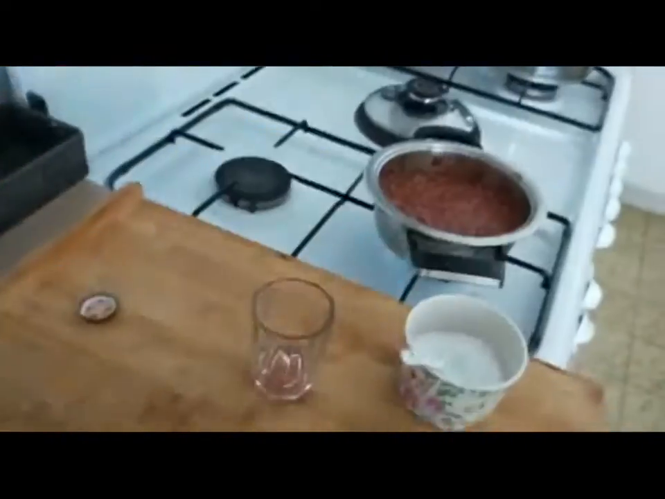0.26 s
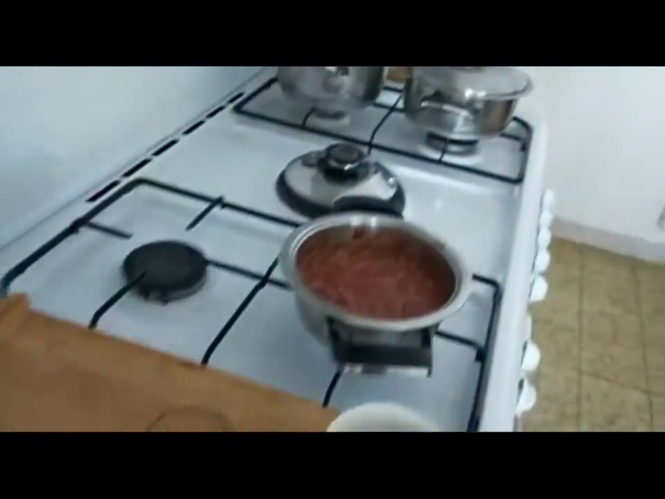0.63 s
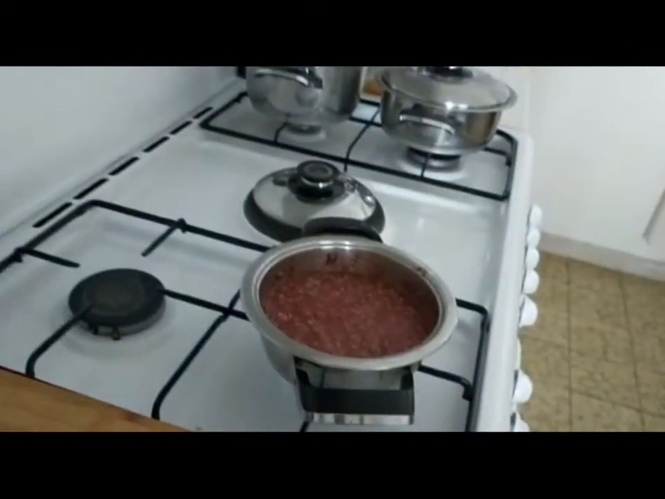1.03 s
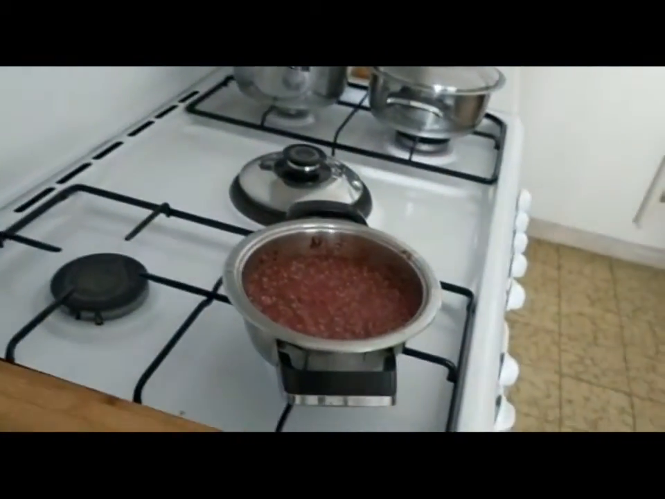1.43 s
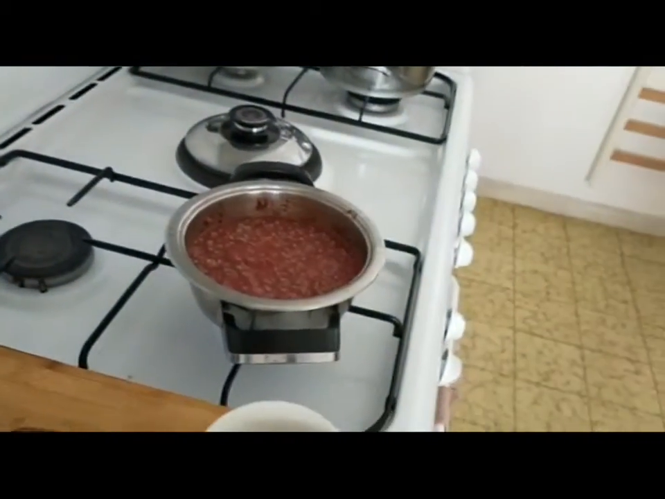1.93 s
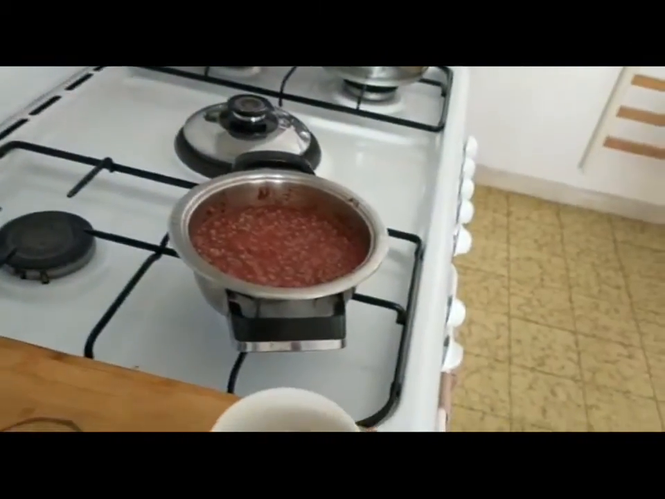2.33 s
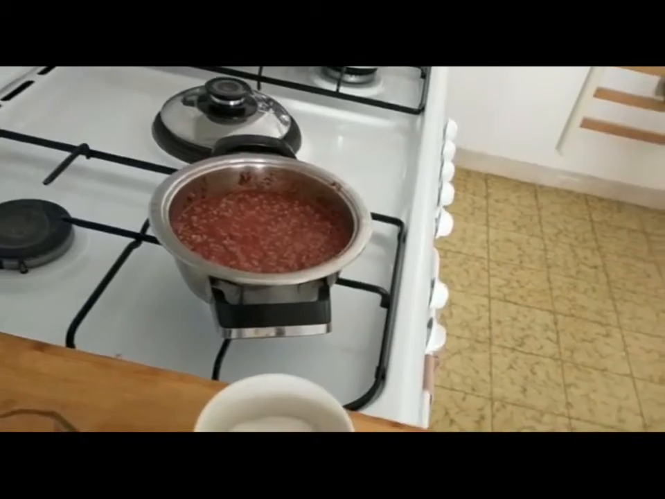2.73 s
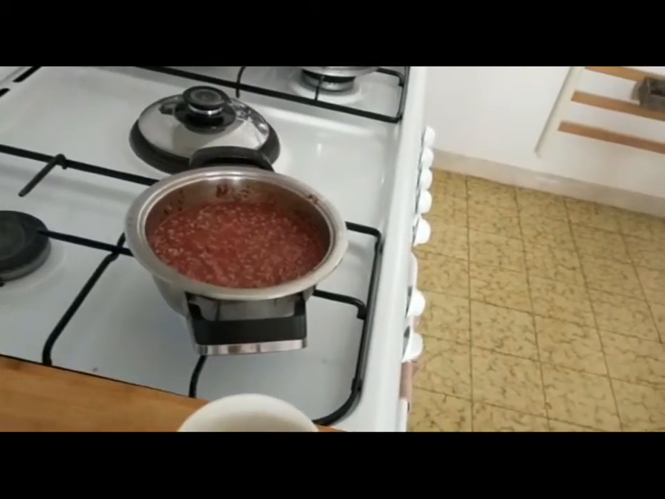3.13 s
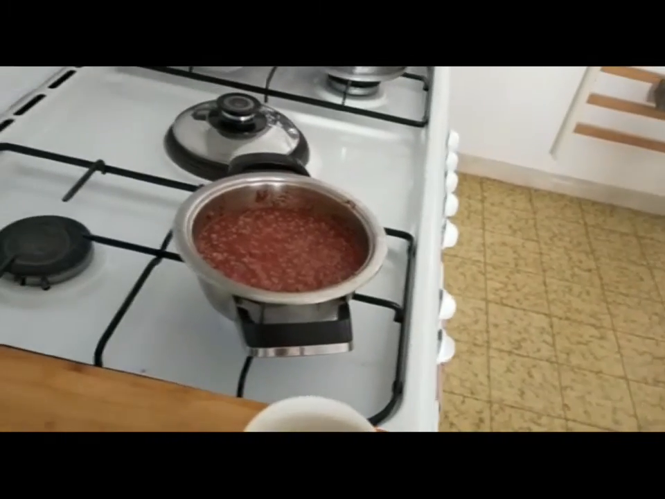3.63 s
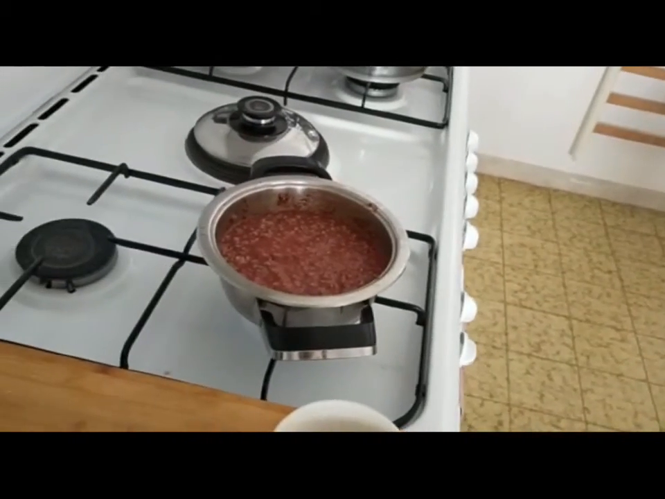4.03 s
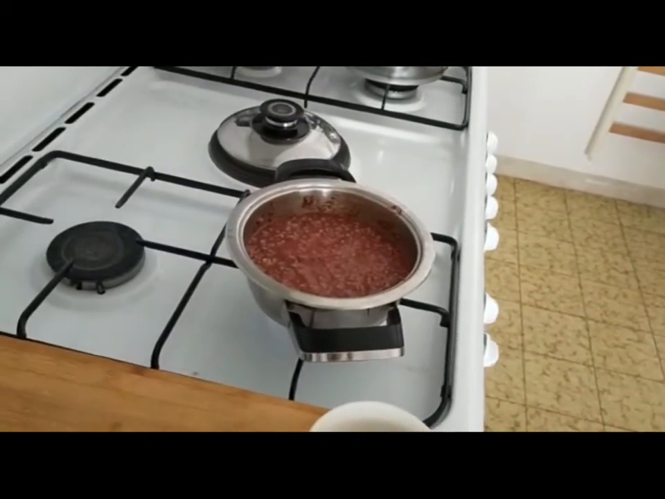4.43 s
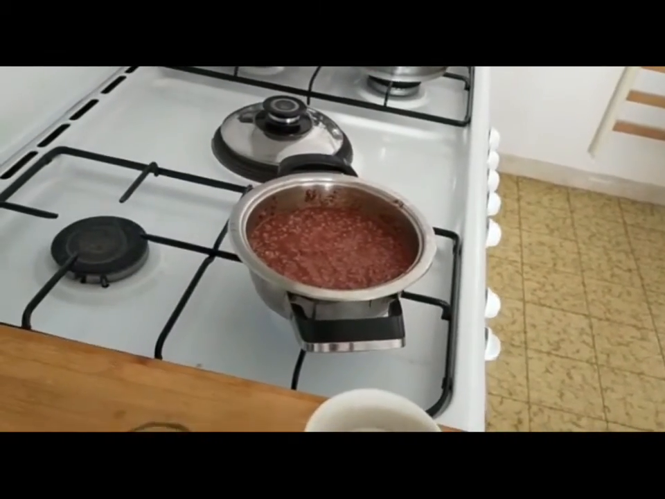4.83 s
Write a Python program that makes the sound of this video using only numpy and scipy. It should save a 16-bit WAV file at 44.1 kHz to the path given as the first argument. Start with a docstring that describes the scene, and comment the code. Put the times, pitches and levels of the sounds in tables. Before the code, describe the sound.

Soft room hush with tiny dry clicks and low bumps from the handheld camera. A glass is set down hard on wood, with a bright crack, brief glassy ring and hard-walled echo. After a pause, water runs in uneven spurts, hissing brightly with gurgles and drops. A second, woodier knock sounds soon after it starts. The water slackens, then surges again and is cut off running.

```python
"""A glass is knocked twice on a wooden worktop; later water runs, hissing, splashing and gurgling.
The knocks are noise cracks plus fading tones. The water is shaped noise, with short tones for bubbles.
Around them is a quiet home kitchen: soft air noise, small dry taps, and the ticks and thumps
of a worn camera's mount. Hard walls answer the taps, the knocks and the water with fading noise."""
import sys
import numpy as np
from scipy import signal
from scipy.fft import rfft, irfft, next_fast_len
from scipy.io import wavfile
from scipy.ndimage import uniform_filter1d, map_coordinates

SR = 44100
rng = np.random.default_rng(int(sys.argv[2]) if len(sys.argv) > 2 else 0)


def to_wav(sig):
    """Store sig (one row per channel, or 1-D mono) as 16-bit WAV at the path in sys.argv[1].

    Samples outside -1..1 are clipped; the rate is SR.
    """
    pcm = np.clip(np.atleast_2d(sig), -1, 1) * 32767
    pcm = np.round(pcm).astype(np.int16)
    wavfile.write(sys.argv[1], SR, pcm.T)  # frames by channels


N = 223454  # length in samples, about 5 s


def amp(db):
    """Turn decibels into a plain multiplier."""
    return 10 ** (np.asarray(db) / 20)


def unit(x):
    """Bring a sound to an average (rms) level of 1."""
    return x / np.sqrt(np.mean(x ** 2) + 1e-20)


def noise(size):
    """White noise: all pitches equally strong."""
    return rng.standard_normal(size)


def along(points, hz):
    """Read a value at each pitch from (pitch_hz, value) points, on a log pitch axis."""
    f, v = np.transpose(points)
    return np.interp(np.log(hz + 1), np.log(f + 1), v)


def curves(rows, before_db=None):
    """Draw one value per sample for each column after the time."""
    s, *columns = np.transpose(rows)
    t = np.arange(N) / SR
    return [np.interp(t, s, column, left=before_db) for column in columns]


def wobble(rate):
    """A smooth random curve through `rate` random points a second."""
    points = noise(int(N * rate / SR) + 4)
    return map_coordinates(points, [np.arange(N) * rate / SR])


def coloured(x, spectrum):
    """Make some pitches of x louder than others, following (pitch_hz, level_db) points; rms 1."""
    m = next_fast_len(len(x) + 8192)
    gain = amp(along(spectrum, np.fft.rfftfreq(m, 1 / SR)))
    return unit(irfft(rfft(x, m) * gain, m)[:len(x)])


def band(x, hz, width_hz):
    """Keep one rounded band of x, at rms 1."""
    half, edge = width_hz / 2, 3 * width_hz
    shape = [(hz - edge, -60), (hz - half, -4), (hz, 0), (hz + half, -4), (hz + edge, -60)]
    return coloured(x, shape)


def patchy(depth_db):
    """White noise that is randomly louder and softer in patches of time and pitch."""
    z = signal.stft(noise(N + 512), nperseg=256)[2]
    field = uniform_filter1d(noise(z.shape), size=5, axis=0)
    field = uniform_filter1d(field, size=6, axis=1)
    return signal.istft(z * amp(depth_db * unit(field)), nperseg=256)[1][:N]


def add(track, s, sound):
    """Mix a sound into the track at s seconds."""
    part = track[round(s * SR):][:len(sound)]
    part += sound[:len(part)]


def ring(modes, t, attack, rough=0):
    """A struck object's fading tones, with slightly new strengths each time; rough makes them unsteady."""
    drift = rough * np.cumsum(noise((len(modes), len(t))), axis=1)
    chance_db = rng.normal(0, 1, len(modes))
    total = 0
    for (hz, db, t60), extra_db, wander in zip(modes, chance_db, drift):
        total = total + amp(db + extra_db - 60 * t / t60) * np.sin(2 * np.pi * hz * t + wander)
    return (1 - np.exp(-t / attack)) * total


def bubbles(s, db, hz, cycles, rise, size=1300):
    """Fading tones whose pitch creeps up, as a bubble's does when it nears the surface."""
    k = np.arange(size)
    turns = hz[:, None] * k / SR
    age = turns / np.maximum(cycles, 1)[:, None]  # 1 = one life, when the tone is down to a tenth
    wave = np.sin(2 * np.pi * turns * (1 + rise * np.minimum(age, 2)))
    wave = wave * np.exp(-2.3 * age) * (1 - np.exp(-age / 0.15))
    at = (s * SR).astype(int)[:, None] + k
    return np.bincount(at.ravel(), (amp(db)[:, None] * wave).ravel(), N + len(k))[:N]


# How long the room rings at each pitch: pitch_hz, time to fall 60 dB (t60_s)
WALL_DECAY = [(100, 0.71), (420, 0.7), (1100, 0.64), (2900, 0.52), (7700, 0.5), (15000, 0.25)]
ROOM_DELAY_S, ROOM_FILLS_S = 0.004, 0.0059  # the answer comes late, then builds up


def walls(x):
    """The room's echo of x: a wash of noise in which each pitch dies at its own speed."""
    hz, t, z = signal.stft(noise(SR), SR, nperseg=256)
    fade = amp(-60 * t / along(WALL_DECAY, hz)[:, None])
    tail = signal.istft(z * fade, SR, nperseg=256)[1]
    tail = tail * (1 - np.exp(-np.arange(len(tail)) / SR / ROOM_FILLS_S))
    delayed = np.pad(x, (round(ROOM_DELAY_S * SR), 0))
    return signal.fftconvolve(delayed, tail / np.linalg.norm(tail))


# Loudness of the kitchen hush, settling at first: time_s, level_db
AIR_LEVEL = [(0, -53.5), (.12, -62), (.3, -64.5), (1, -65.5), (2.7, -66)]
# Colour of the hush: pitch_hz, relative_level_db (per Hz)
AIR_COLOUR = [(120, -50), (200, -11.5), (322, 3.5), (380, -5), (647, -4), (709, -5), (1120, -5.5),
              (2050, -4), (3760, -16), (4680, -16.5), (5420, -16), (7540, -10), (9750, -21.5),
              (14900, -0.5), (16000, -6.5)]
# Colour of the low rumble: pitch_hz, relative_level_db (per Hz)
RUMBLE_COLOUR = [(12, -34), (20, 5.5), (33, -14.5), (130, -10), (189, -21.5), (300, -27.5), (390, -54),
                 (660, -120)]
# Narrow steady whines: pitch_hz, width_hz, level_db
WHINE_BANDS = [(2025, 420, -74), (3500, 80, -92), (4880, 120, -86), (7490, 500, -78), (15400, 400, -74.5),
               (12830, 300, -80)]


def hush():
    """Distant air noise with a few narrow whines, over a low uneven rumble."""
    air = amp(curves(AIR_LEVEL)[0]) * coloured(patchy(depth_db=2.0), AIR_COLOUR)
    whines = sum(amp(db) * band(noise(N), hz, width) for hz, width, db in WHINE_BANDS)
    rumble = amp(-66.5 + 2.6 * wobble(12.0)) * coloured(noise(N), RUMBLE_COLOUR)
    return air + whines + rumble


# Short noise bursts; all rows but the last are small dry taps and ticks, and the last is one thin,
# very high spit of the spray: start_s, start_level_db, centre_hz, spread_octaves, t60_s
SHORT_BURSTS = [(.108, -58, 890, 1.6, 0.049), (1.58, -56, 3800, 0.91, 0.007),
                (1.689, -61.5, 6000, 0.97, 0.032), (1.839, -50.5, 4560, 1.5, 0.0064),
                (2.415, -59, 1490, 0.78, 0.03), (2.487, -46.5, 2610, 0.6, 0.011),
                (2.5, -45.5, 604, 1.02, 0.06), (2.732, -43, 1060, 0.97, 0.023),
                (4.021, -29.5, 15000, 0.082, .03)]
BURST_ROOM_DB = -5.5


def short_bursts(rows):
    """Each row is a burst of noise, spread around its centre pitch, with the room's answer."""
    out, t = np.zeros(N), np.arange(SR // 8) / SR
    # (steps of the spread away from the centre, relative level in dB)
    shape = [(-7.0, -48), (-2.5, 0), (0.5, 4.5), (2, -20.5), (0.5, -28), (15.5, -46)]
    for s, db, hz, spread, t60 in rows:
        colour = [(hz * 2 ** (spread * step), level_db) for step, level_db in shape]
        burst = amp(db - 60 * t / t60) * coloured(noise(len(t)), colour)
        add(out, s, burst)
        add(out, s, amp(BURST_ROOM_DB) * walls(burst))
    return out


def taps():
    """Small dry taps and ticks: short bursts of noise."""
    return short_bursts(SHORT_BURSTS[:-1])


# The camera mount shifts: start_s, thump_start_level_db, tick_level_db (before the tick's shaping)
MOUNT_SHIFTS = [(0.12, -44.5, -54), (0.144, -55, -52), (0.257, -53, -39), (0.318, -46, -41),
                (0.351, -55, -48), (0.585, -48, -40), (0.629, -46, -39), (0.646, -48.5, -43),
                (0.717, -42, -60), (0.974, -55, -45), (1.484, -50.5, -37.5), (1.577, -53.5, -38.5),
                (1.6, -50.5, -44), (1.677, -50, -40), (1.839, -45.5, -38), (1.869, -48.5, -49),
                (2.024, -52, -60), (2.324, -55, -41), (2.594, -47, -43), (3.16, -48, -51),
                (4.975, -44.5, -28.5)]
# Faint short tones: start_s, peak_level_db
FAINT_PIPS = [(0.449, -61.5), (0.477, -62), (0.6709, -60)]
HOUSING_HZ, HOUSING_SCATTER, HOUSING_T60_S = 88, .1, 0.055  # scatter: share of the pitch
TICK_S, PIP_HZ = 0.00012, 1205


def mount():
    """Each shift is a dull tick and a few fading low cycles of the housing; faint pips are added."""
    out, t = np.zeros(N), np.arange(SR // 20) / SR
    pitches = HOUSING_HZ * (1 + HOUSING_SCATTER * noise(len(MOUNT_SHIFTS)))
    for (s, db, tick_db), hz in zip(MOUNT_SHIFTS, pitches):
        thump = amp(db - 60 * t / HOUSING_T60_S) * np.sin(2 * np.pi * hz * t)
        tick = amp(tick_db) * t / TICK_S * np.exp(-t / TICK_S)
        add(out, s, tick - thump)
    for s, db in FAINT_PIPS:
        swell = np.exp(-((t - .008) / 0.0051) ** 2)  # loudest 8 ms after the start
        add(out, s, amp(db) * np.sin(2 * np.pi * PIP_HZ * t) * swell)
    return out


# Glass on wood, one list of blows for each spot: start_s, blow_level_db, then levels relative to the
# blow: worktop_db, glass_wall_db, glass_base_db, cupboard_db, floor_boom_db, room_db
KNOCK_BLOWS = [
    [(1.0930, -4.5, -28, -23, -47, -38, -47.5, -24.5), (1.1220, -13, -34, -26, -48, -38, -42, -30)],
    [(3.2980, -5, -19, -36, -36, -29.5, -29, -19.5)],
]
# Colour of a blow at each of the two spots: pitch_hz, relative_level_db (per Hz)
BLOW_COLOURS = [
    [(29, -42.5), (50, -13), (138, -6), (184, -27), (277, -7.5), (461, -24), (520, -16), (1780, 1.5),
     (4560, -32.5), (6550, -29), (7570, -24.5), (8970, -55.5), (12000, -27), (16000, -36.5)],
    [(29, -47), (50, -22), (112, -17), (152, -19), (194, -21), (420, -3.5), (781, -7), (979, 0.5),
     (1270, -2), (2200, 2), (4500, -31.5), (5850, -63), (9900, -120)],
]
# Tones of the wooden worktop: pitch_hz, relative_level_db, t60_s
WOOD_TONES = [(420, -12, .2), (535, -9, .14), (830, -16, .4), (958, -3, .28), (1050, -12, .25),
              (1162, -8, .35), (1305, -14, .35), (1370, -7, .15), (1418, -9, .25), (1515, -4, .15),
              (1585, -9, .2), (1628, -9, .3), (1725, -8, .3), (1792, -9, .25), (1828, -5, .25),
              (1908, -7, .22), (2125, -6, .12), (2180, -9, .3), (2203, -7, .33), (2240, -10, .2),
              (2450, -16, .25), (2735, -18, .3), (2900, -19, .25), (3300, -23, .2)]
# Tones of the glass wall: pitch_hz, relative_level_db, t60_s
GLASS_TONES = [(7000, -13, 0.3), (7200, -10, .15), (7450, 4, 0.096), (7760, -7.5, 0.12), (10210, -27.5, .1),
               (10630, -35, .1), (11900, -6, 0.077), (11900, -8, 0.11), (13040, -18.5, .15),
               (15200, -19, .12)]
# Tones of the thick base of the glass: pitch_hz, relative_level_db, t60_s
BASE_TONES = [(5157, 7, 0.1), (6950, -5, 0.43)]
# Tones of the cupboard under the worktop: pitch_hz, relative_level_db, t60_s
CUPBOARD_TONES = [(148.8, -6, 0.71), (293, -15.5, 0.86), (99.7, -16, 0.4)]
# Tones of the floor, which answers late: pitch_hz, relative_level_db, t60_s (before its slow swell)
FLOOR_TONES = [(45.3, -2, 0.78), (64, -1.5, 0.48)]


def knocks():
    """Each blow cracks, rings worktop, glass, cupboard and floor, and fills the room."""
    out, t = np.zeros(N), np.arange(SR * 3 // 4) / SR
    for colour, blows in zip(BLOW_COLOURS, KNOCK_BLOWS):
        click = coloured(signal.unit_impulse(800, "mid"), colour)
        for s, db, wood_db, glass_db, base_db, cupboard_db, floor_db, room_db in blows:
            crack = 0.54 * coloured(noise(len(t)), colour)
            crack = crack * amp(-60 * t / 0.04) * (1 - np.exp(-t / 0.0019))
            wood = amp(wood_db) * ring(WOOD_TONES, t, attack=.0012, rough=.003)
            glass = amp(glass_db) * ring(GLASS_TONES, t, attack=.007, rough=.035)
            glass = glass + amp(base_db) * ring(BASE_TONES, t, attack=0.0013, rough=.008)
            cupboard = amp(cupboard_db) * ring(CUPBOARD_TONES, t, attack=0.0085, rough=0.0051)
            floor = amp(floor_db) * t / 0.14 * ring(FLOOR_TONES, t, attack=0.037)
            add(out, s, amp(db) * (crack + wood + glass + cupboard + floor))
            # the click sits mid-buffer, so its echo is cut to start with the blow
            add(out, s, amp(db + room_db) * walls(click)[len(click) // 2:])
            add(out, s, amp(db - 8) * walls(wood + glass))
    return out


# The water starts, dips briefly, slackens and runs full again: time_s, spray_level_db, stream_level_db
WATER_LEVELS = [(2.66, -84, -83.5), (2.75, -64.5, -63), (2.99, -42.5, -48), (3.01, -37, -51.5),
                (3.13, -36, -50), (3.3, -37, -51), (3.39, -42, -68), (3.41, -34, -39), (3.52, -34.5, -44.5),
                (3.68, -35.5, -48.5), (3.78, -41.5, -46.5), (4.0, -44.5, -48), (4.24, -46.5, -49),
                (4.28, -43, -48), (4.44, -51.5, -53), (4.455, -39, -45.5), (4.52, -43.5, -50),
                (4.55, -33, -50.5), (4.68, -38, -49.5), (5.07, -36, -50.5)]
# The clearest bursts of spray: start_s, level_db (before a quick rise and fade)
SPRAY_BURSTS = [(2.895, -43), (2.9662, -40), (3.0054, -28), (3.037, -45), (3.0696, -47), (3.1243, -32),
                (3.1929, -46), (3.305, -33), (3.64, -38), (3.732, -46), (3.7932, -36), (3.8895, -36),
                (3.944, -34.5), (4.0206, -47), (4.091, -35), (4.161, -33), (4.5313, -36), (4.632, -26),
                (4.70, -31), (4.731, -30), (4.7704, -48), (4.80, -46)]
# Colour of the spray: pitch_hz, relative_level_db (per Hz)
SPRAY_COLOUR = [(2060, -22.5), (3500, -1), (4920, -13), (5280, -7.5), (6520, -2.5), (7360, 5), (7700, 3),
                (9220, -9.5), (13300, 5.5), (15200, 1.5), (16200, -7)]
# Colour of the stream: pitch_hz, relative_level_db (per Hz)
STREAM_COLOUR = [(120, -41), (200, -26), (281, -16), (598, -16.5), (784, -3), (879, -10.5), (1150, -1.5),
                 (1760, -6.5), (2630, -1), (4640, -20), (6000, -13), (7800, -48), (13200, -120)]
SPIT_RISE_S, SPIT_T60_S = 0.001, 0.03
# under the full spray level the finest mist fades: dB per dB, down to a least level
FULL_SPRAY_DB, MIST_FADES, MIST_LEAST_DB = -40, 0.55, -3


def water():
    """Spray hisses in spurts; the stream is noise and small random bubbles; the walls answer both."""
    spray_db, stream_db = curves(WATER_LEVELS, before_db=-120)
    start = WATER_LEVELS[0][0]
    left_s = N / SR - start

    spurt = wobble(36)
    flow = amp(spray_db) * unit(amp(1.0 * spurt + 2.16 * wobble(90)))
    t = np.arange(SR // 10) / SR
    for s, db in SPRAY_BURSTS:
        add(flow, s, amp(db - 60 * t / SPIT_T60_S) * (1 - np.exp(-t / SPIT_RISE_S)))

    # sparse droplets make the hiss grainy
    droplets = noise(N) * (rng.random(N) < .03)
    when, pitch, life, size = rng.random((2400, 4)).T
    mist = bubbles(start + when * left_s, 8 * size, 4500 * 3.4 ** pitch, 30 + 60 * life, rise=0.0057)
    spray = patchy(depth_db=1.8) + .22 * unit(droplets) + .5 * unit(mist)
    spray = coloured(spray, SPRAY_COLOUR)
    # the finest mist, above 10 kHz, needs a strong spray
    low_pass = signal.butter(4, 10000, fs=SR, output="sos")
    coarse = signal.sosfiltfilt(low_pass, spray)
    fine_db = np.clip(MIST_FADES * (spray_db - FULL_SPRAY_DB), MIST_LEAST_DB, 1)
    spray = coarse + amp(fine_db) * (spray - coarse)

    when, pitch, life, size = rng.random((900, 4)).T
    fizz = bubbles(start + when * left_s, 14 * size, 1500 * 3.6 ** pitch, 6 + 22 * life, rise=0.0068)
    stream = coloured(patchy(depth_db=1.5), STREAM_COLOUR) * unit(amp(2.4 * spurt))
    stream = stream + .5 * unit(fizz)

    near = flow * spray + amp(stream_db) * unit(stream)
    return near + amp(-8.0) * walls(near)[:N]


# Single gurgles and drops: start_s, level_db, pitch_hz, life_cycles (until a tenth is left)
LARGE_DROPS = [(3.039, -28.5, 2605, 21), (3.082, -28.5, 2560, 18), (3.106, -29, 2680, 16),
               (3.205, -29.5, 3000, 14), (3.454, -23.5, 2170, 9.5), (3.646, -23, 5070, 18),
               (3.686, -22.5, 2760, 31), (3.7, -30, 2860, 19), (3.728, -20, 2280, 19),
               (3.826, -29.5, 844, 17), (3.864, -30.5, 818, 23), (3.875, -23.5, 1630, 15),
               (3.915, -27.5, 1645, 47), (3.968, -36, 1650, 28), (4.009, -32.5, 3560, 28),
               (4.088, -36, 2270, 20), (4.12, -33, 1600, 15), (4.161, -29, 2200, 19),
               (4.162, -27, 4970, 16), (4.29, -34, 2314, 38), (4.477, -26.5, 5260, 16),
               (4.504, -36, 1956, 85), (4.614, -19.5, 2610, 13), (4.716, -24.5, 2960, 10),
               (4.795, -29, 2950, 12), (4.849, -25.5, 2980, 12), (4.898, -29.5, 2830, 13)]
# Colour of the splashes: pitch_hz, relative_level_db (per Hz)
SPLASH_COLOUR = [(500, -50), (1500, -10), (2500, 6), (4000, -1.5), (6000, -1), (9000, -12), (13000, -3),
                 (16000, -11)]
SPLASH_DB, NEIGHBOUR_DB = -7, -6.5  # relative to the drop's level


def drops():
    """A large drop splashes and traps a bubble with two softer, higher neighbours."""
    s, db, hz, cycles = np.transpose(LARGE_DROPS)
    out = bubbles(s, db, hz, cycles, rise=0.007, size=4000)
    for _ in range(2):
        late, pitch = rng.random((len(s), 2)).T
        higher_hz = hz * 1.9 ** (pitch + .1)
        out = out + bubbles(s + .012 * late, db + NEIGHBOUR_DB, higher_hz, .8 * cycles, rise=.03)
    burst, t = np.zeros(N), np.arange(SR // 20) / SR
    for at, level_db in zip(s, db + SPLASH_DB):
        add(burst, at, amp(level_db - 60 * t / 0.038) * (1 - np.exp(-t / 0.0019)))
    out = out + burst * coloured(noise(N), SPLASH_COLOUR)
    return out + amp(-12) * walls(out)[:N]


def high_spit():
    """One thin, very high spit of the spray: a narrow burst of noise."""
    return short_bursts(SHORT_BURSTS[-1:])


def scene():
    """All the sounds of the kitchen together, in one channel."""
    return (hush() + taps() + mount() + knocks() + water() + drops() + high_spit())[None]


MIC_HZ, TOP_HZ = 15550, 16000  # the treble starts to fade, and is gone


def record(dry):
    """The microphone drops the deepest bass; the camera fades out steeply at its band limit."""
    m = next_fast_len(N + SR // 2)
    hz = np.fft.rfftfreq(m, 1 / SR)
    bass = (1j * hz / (28 + 1j * hz)) ** 2
    treble = np.clip((TOP_HZ - hz) / (TOP_HZ - MIC_HZ), 0, 1) ** 2
    return irfft(rfft(dry, m) * bass * treble, m)[..., :N]


dry = scene()
out = record(dry)
to_wav(out)
```